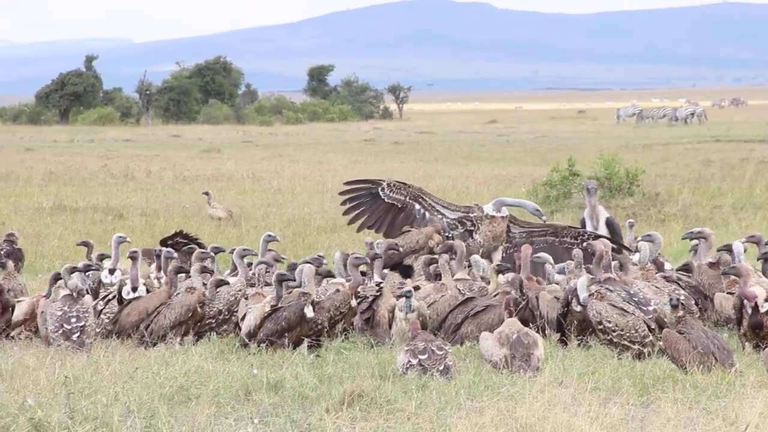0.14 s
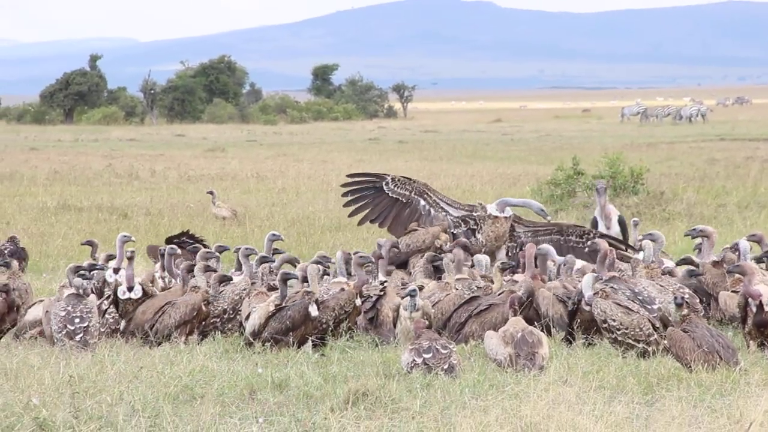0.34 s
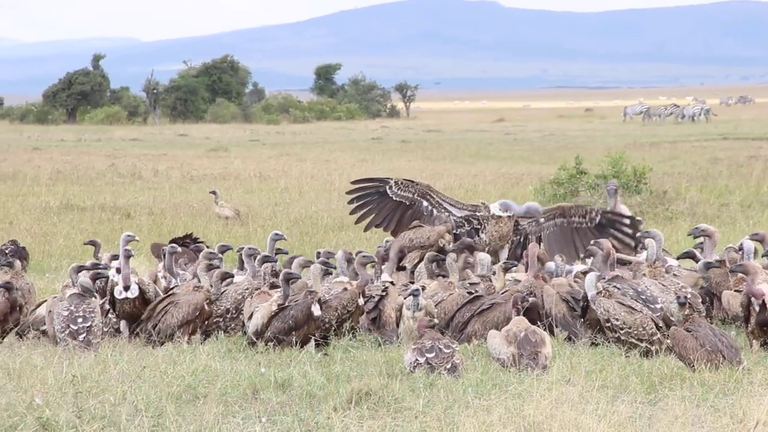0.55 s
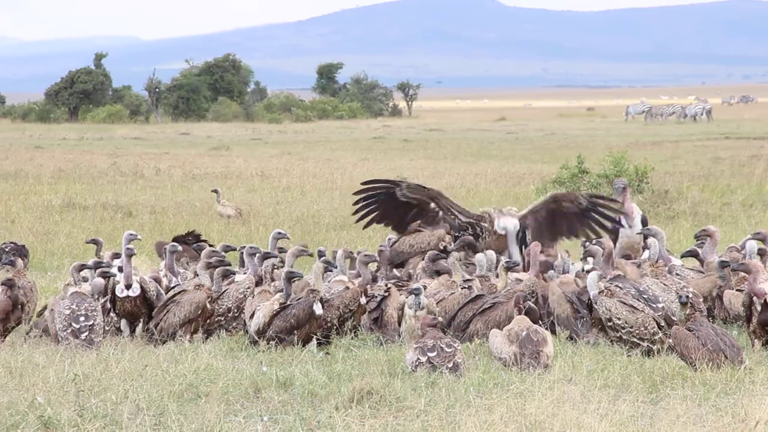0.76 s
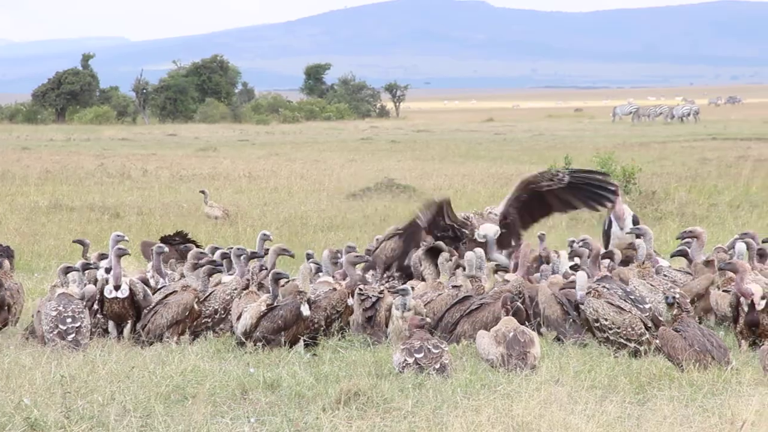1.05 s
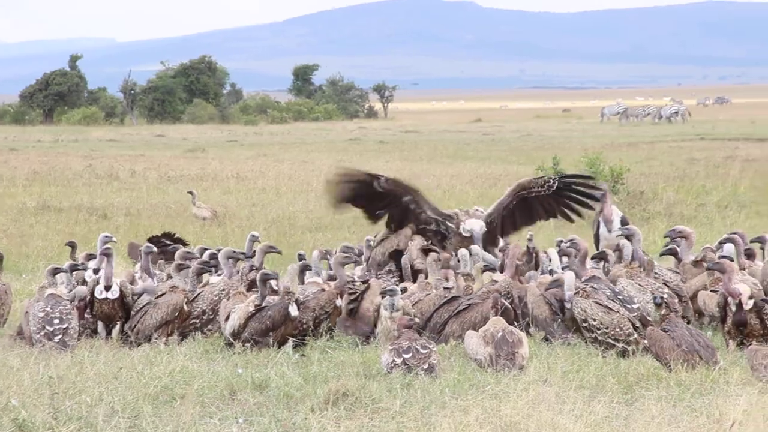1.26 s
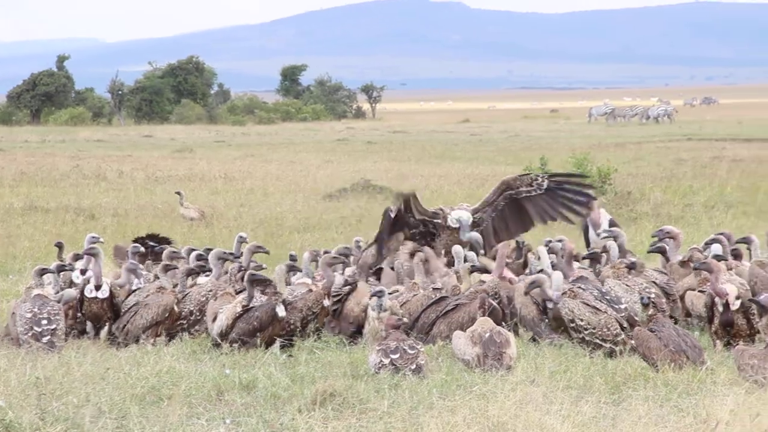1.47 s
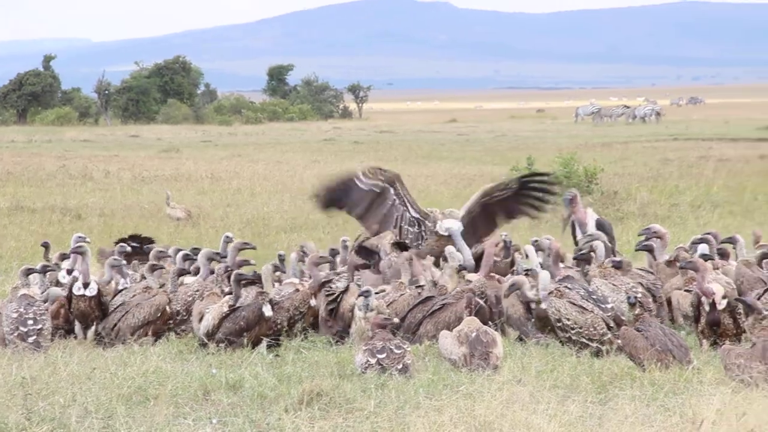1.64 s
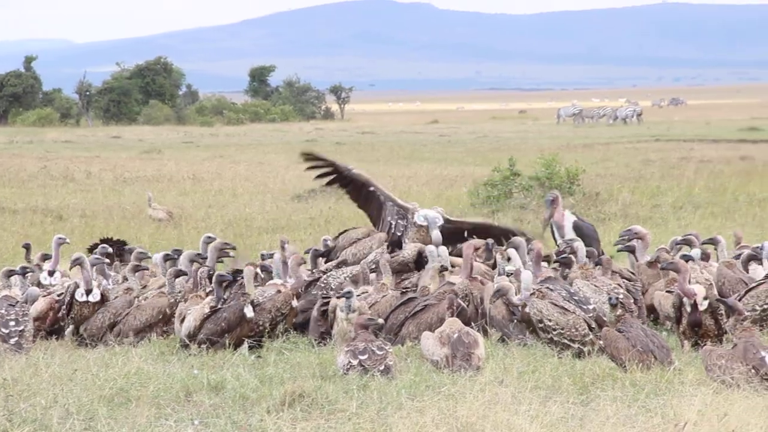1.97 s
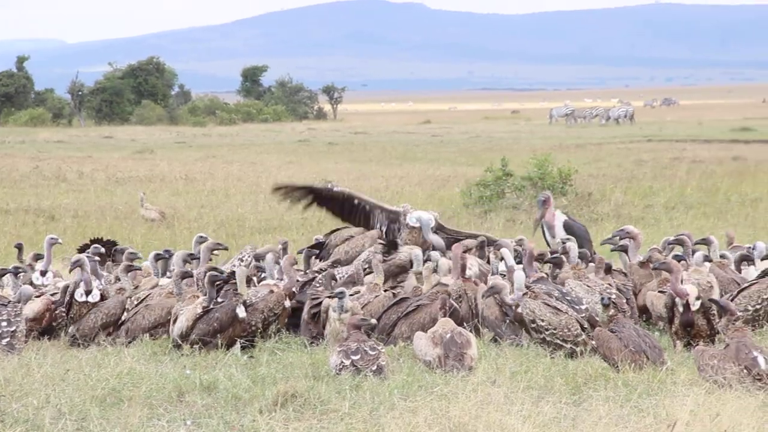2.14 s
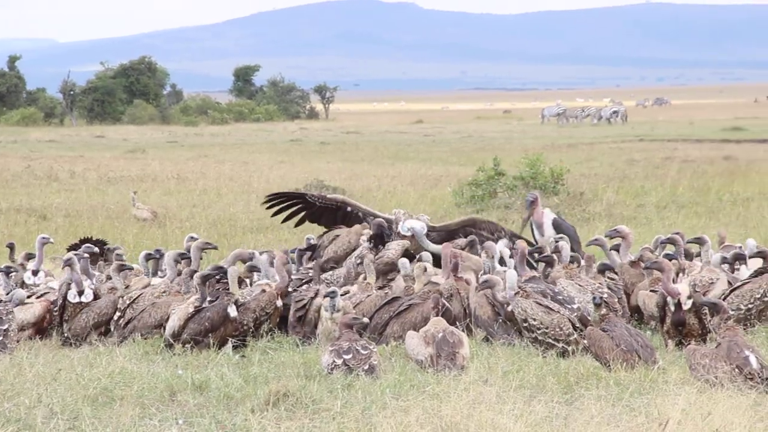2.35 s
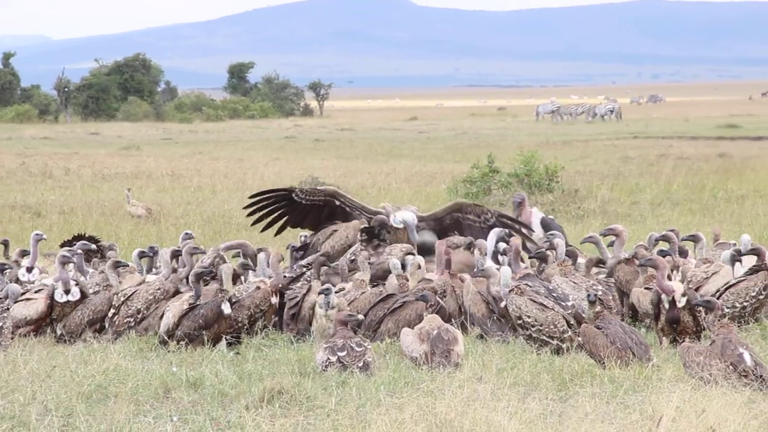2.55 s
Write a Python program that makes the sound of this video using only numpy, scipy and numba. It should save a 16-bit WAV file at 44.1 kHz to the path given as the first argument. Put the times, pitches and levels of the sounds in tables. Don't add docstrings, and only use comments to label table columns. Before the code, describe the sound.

Hoarse, clicking vulture calls burst out in quick succession, joined by yelps and whines, until a loud rasp leads into a long rough hiss; faint high trills, distant croaking crowd, low wind rumble and recorder hiss.

```python
import sys
import numpy as np
from scipy import signal
from scipy.fft import rfft, irfft
from scipy.io import wavfile
from scipy.ndimage import uniform_filter1d
from numba import njit

SR = 44100
rng = np.random.default_rng(int(sys.argv[2]) if len(sys.argv) > 2 else 0)


def natural_amplitude(level_db):
    exponent = np.asarray(level_db, float) / 20
    return 10 ** exponent


def generate_wav(signal):
    frames = np.transpose(np.atleast_2d(signal))
    scaled = np.clip(frames, -1, 1) * 32767
    pcm = np.round(scaled).astype(np.int16)
    wavfile.write(sys.argv[1], SR, pcm)


N = 119511


@njit
def svf(x, hz, width):
    y, b, l = np.empty(len(x)), 0., 0.
    for i in range(len(x)):
        g, k = np.tan(np.pi * hz[i] / SR), width / hz[i]
        v = (b + g * (x[i] - l)) / (1 + g * (g + k))
        b, l, y[i] = 2 * v - b, l + 2 * g * v, k * v
    return y


def band(x, lo_hz, hi_hz):
    return signal.sosfilt(signal.butter(2, [lo_hz, hi_hz], "bandpass", fs=SR, output="sos"), x)


def unit(x):
    return x / np.sqrt(np.mean(x ** 2))


def walk(rate, n):
    k = int(SR / rate)
    steps = np.repeat(rng.standard_normal(n // k + 1), k)
    return 1.14 * uniform_filter1d(uniform_filter1d(steps, k), k)[:n]


def add(out, start_s, x):
    i = int(start_s * SR)
    a, b = max(i, 0), max(min(i + len(x), N), 0)
    out[a:b] += x[a - i:][:b - a]


def clicks(n, hz, breath_db, jitter=.45, scatter_db=5):
    c = rng.standard_normal((n // 40, 2))
    at = np.cumsum(np.exp(jitter * c[:, 0]) * SR / hz).astype(int)
    x = np.zeros(n)
    x[at[at < n]] = natural_amplitude(scatter_db * c[at < n, 1])
    breath = natural_amplitude(breath_db + 1.53 * walk(150, n)) * rng.standard_normal(n)
    return unit(x - x.mean()) + breath


def throat(x, peaks, sign=-1, drift=.01):
    out = 0
    for k, (hz, width, db) in enumerate(peaks):
        moving_hz = hz * (1 + drift * walk(12, len(x)))
        out = out + sign ** k * natural_amplitude(db) * svf(x, moving_hz, 1. * width)
    return out


def rasps():
    # start in seconds, length in seconds, level in dB, throat in Hz, upper resonance in dB
    calls = [(-.02, 0.044, -35, 2350, -11), (0.038, .19, -38.5, 1850, -5.5), (0.237, 0.086, -48, 1560, 2.5),
             (.30, 0.064, -38, 1750, -8), (0.367, 0.21, -41.5, 1950, -3.5), (0.403, 0.058, -43, 1720, -6),
             (0.549, 0.12, -38.5, 1650, -11), (0.659, 0.1, -37.5, 1930, -9.5),
             (0.742, 0.038, -35, 1640, -16), (0.776, 0.045, -35.5, 1920, -5.5),
             (.815, 0.039, -37, 1450, -8.5), (0.851, 0.02, -34.5, 2040, -3.5),
             (0.887, 0.023, -39, 1810, -11), (.94, 0.023, -31.5, 1910, -7.5),
             (1.021, 0.043, -37, 1810, -18), (1.155, 0.06, -41, 1750, -3), (1.209, 0.13, -38, 1880, -8),
             (1.443, 0.073, -38.5, 1620, -3.5), (1.648, 0.155, -23, 1720, -19),
             (1.654, 0.05, -29.5, 1950, -16)]
    click_hz, breath_db, scatter_db = 417.2, 1, 3
    attack_s, swell, release_s, sag_db = .009, 0.053, .014, -4.5
    fall_per_s, upper_ratio = .6, 1.924
    out, n = np.zeros(N), 2 * SR // 9
    t = np.arange(n) / SR
    for s, length, db, hz, up_db in calls:
        x = clicks(n, click_hz, breath_db, .4, scatter_db)
        hz = hz * (1 - fall_per_s * (t - length / 2))
        low_peaks = [(0.773 * hz, 180, -3), (1.003 * hz, 220, 0), (0.991 * hz, 220, 0), (1.286 * hz, 320, -5)]
        up_peaks = [(0.77 * upper_ratio * hz, 300, -2), (upper_ratio * hz, 600, 0), (2.56 * hz, 500, -10)]
        low = unit(throat(x, low_peaks, -1.025, 0.022))
        up = unit(throat(x, up_peaks))
        swelling = np.clip(t / (attack_s + swell * length), 0, 1)
        release = np.exp(-np.maximum(t - length, 0) / release_s * 2)
        level = natural_amplitude(db + sag_db * np.clip(t / length, 0, 1))
        add(out, s, level * swelling * release * (low + natural_amplitude(up_db) * up))
    return out


def air(t):
    # frequency in Hz, noise density of the open plain in dB per Hz
    plain_curve = [(12, -29), (20, -4), (96, -14), (897, -16), (1060, -9), (2750, -15.5), (2990, -33),
                   (4540, -78), (16000, -54)]
    # resonance in Hz, width in Hz, level in dB
    crowd_peaks = [(604, 20.3, 2), (803, 24, 2), (1245, 250, -3), (1730, 820, -1), (3530, 4140, -8.5),
                   (4900, 1070, -7)]
    # centre of a wind bump in seconds, level in dB, length in seconds
    bumps = [
        (0.037, -45.5, 0.069),
        (0.149, -49.5, 0.11),
        (0.325, -45, 0.062),
        (0.415, -49, 0.066),
        (0.594, -61, 0.083),
        (1.016, -62, 0.039),
        (1.116, -46.5, 0.084),
    ]
    plain_db, crowd_db, rumble_db, breeze_db = -53.5, -51, -63.5, -74.5
    f = np.fft.rfftfreq(N, 1 / SR) + 1
    p = np.array(plain_curve)
    shape = natural_amplitude(np.interp(np.log(f), np.log(p[:, 0]), p[:, 1])) * (f > 90)
    plain = unit(irfft(rfft(rng.standard_normal(N)) * shape, N))

    croaks = clicks(N, 112, -3, .12, 1.7)
    crowd = unit(band(throat(croaks, crowd_peaks), 450, 6400)) * natural_amplitude(crowd_db + 2 * walk(10.05, N))

    rumble = unit(throat(rng.standard_normal(N), [(159.3, 18.7, 5.0), (308, 110, -3.5)]))
    rumble = rumble * natural_amplitude(rumble_db + 0.5 * walk(7.3, N))

    gust = natural_amplitude(breeze_db + 2 * walk(7.9, N))
    for s, db, length in bumps:
        gust = gust + natural_amplitude(db) * np.exp(-2 * ((t - s) / length * 2) ** 2)
    wind = throat(throat(rng.standard_normal(N), [(41, 39, 0)]), [(42.2, 33, 0)])
    wind = wind / np.sqrt(uniform_filter1d(wind ** 2, size=6000) + 1e-18)
    return natural_amplitude(plain_db) * plain + crowd + rumble + gust * wind


def grass_bird():
    trill_ends = [.077, 0.877, 1.477, 2.022, 2.595]
    # offset from the trill's last note in seconds, level in dB
    trill = [(0, 0), (-.025, 0), (-.047, -1), (-.066, -2), (-.082, -4), (-.094, -7)]
    triples = [.155, .314, .959, 1.555, 1.636, 1.724, 2.100, 2.181, 2.673]
    doubles = [0.229, .417, .535, 0.686, 1.040, 1.153, 1.275, 1.817, 2.279, 2.399]
    # offset from the chip's last note in seconds, level in dB
    chip = [(.002, -1), (-.008, -3), (-.019, -5)]
    note_db, note_s, note_hz, fall_hz = -52.5, 0.015, 7120, 850
    out = np.zeros(N)
    # times, notes, how far below note_hz, share of the full note length
    phrases = ((trill_ends, trill, 0, 1), (triples, chip, 250, .7), (doubles, chip[:2], 250, .7))
    for starts, notes, drop_hz, span in phrases:
        u = np.arange(int(span * note_s * SR)) / (span * note_s * SR)
        for s in starts:
            for offset, db in notes:
                c = rng.standard_normal(2)
                hz = note_hz - drop_hz + 40 * c[0] - span * fall_hz * u
                tone = np.sqrt(2) * np.sin(2 * np.pi * np.cumsum(hz) / SR)
                add(out, s + offset - .002, natural_amplitude(note_db + db + c[1]) * np.sin(np.pi * u) * tone)
    return out


def stack(hz, partials_db):
    phase = 2 * np.pi * np.cumsum(hz * (1 + .006 * walk(119.5, len(hz)))) / SR
    out = 0
    for k, db in enumerate(partials_db):
        out = out + natural_amplitude(db + 2 * walk(39.6, len(hz))) * np.sin((k + 1) * phase)
    return out * np.sqrt(2)


def squeaks():
    # start in seconds, length in seconds, level in dB, pitch in Hz, glide as a share of pitch
    yelps = [(1.116, 0.0366, -38, 520, -0.088), (1.275, 0.062, -40.5, 680, -0.066),
             (.73, .07, -42.5, 600, -0.096), (.59, .05, -42.5, 620, .05), (0.53, 0.1, -51.5, 960, .07),
             (1.162, 0.042, -36, 490, 0.33), (1.69, 0.118, -39.5, 388, -.14),
             (0.098, 0.125, -44.5, 640, .03), (0.78, 0.0603, -44, 652.5, 0.032),
             (1.6, 0.054, -38.5, 550, 0.011), (.41, 0.065, -42, 570, -0.0073),
             (0.45, 0.066, -54, 1000, 0.14), (.305, 0.0344, -43.5, 460, -0.0084)]
    coos = [(.19, .14, -56, 800, 0.226), (0.31, 0.088, -58, 850, -0.005), (.66, 0.223, -58, 830, -0.053),
            (0.3, 0.057, -53, 1200, 0)]
    screeches = [(1.205, 0.091, -42, 600, -0.0194), (.17, 0.0482, -52, 580, 0.0039)]
    yelp_partials = [-40, -20, 0, -3, -15]
    coo_partials = [0, -14]
    screech_partials = [-40, -14, 0, -9, -6, -10, -13, -8, -22]
    out = np.zeros(N)
    for calls, partials_db in ((yelps, yelp_partials), (coos, coo_partials), (screeches, screech_partials)):
        for s, length, db, hz, glide in calls:
            u = np.clip(np.arange(SR // 4) / SR / length, 0, 1)
            bow = np.abs(np.sin(np.pi * u))
            arch = max(.011 / length - .11, 0)
            pitch = hz * (1 + glide * (u - .5) + arch * (bow - .6))
            add(out, s, natural_amplitude(db) * (u < 1) * bow ** 0.5 * stack(pitch, partials_db))
    return out


def whines(t):
    # time in seconds, pitch in Hz, level in dB
    whine_calls = [
        [(.15, 600, -56), (.25, 600, -56), (.33, 645, -53), (.39, 570, -54), (.5, 570, -55), (.57, 590, -56)],
        [(.57, 620, -58), (.6, 648, -53), (.7, 558, -53), (.78, 538, -54), (.87, 610, -54), (.94, 570, -60),
         (1.0, 555, -58), (1.07, 610, -56)],
    ]
    whine_partials = [-16, 4, -4, 0, -7, -13]
    out = np.zeros(N)
    for call in whine_calls:
        s, hz, db = np.array(call).T
        fade = np.clip(np.minimum(t - s[0], s[-1] - t) / 0.018, 0, 1)
        out += stack(np.interp(t, s, hz), whine_partials) * natural_amplitude(np.interp(t, s, db)) * fade
    return out


def long_rasp(t):
    # time in seconds, level in dB, upper resonance in dB, beak-open treble in dB
    course = [(1.12, -50, -2.5, -12), (1.17, -42, -7, -22), (1.26, -42.5, -5.5, -13),
              (1.33, -40.5, -1, -19), (1.4, -42.5, -4.5, -23), (1.57, -34.5, -7, -25.5),
              (1.8, -35.5, -7, -26), (1.92, -37, -3, -19), (2.01, -35, -3, -19.5), (2.11, -34.5, -2, -20),
              (2.18, -32, -1, -18), (2.3, -32, -3, -18.5), (2.4, -33.5, -3, -19.5), (2.5, -35.5, -6, -15.5),
              (2.6, -35, -5, -22.5), (2.71, -36.5, -2, -23)]
    # Hz, width in Hz, level in dB
    lower_peaks = [(799, 32, 0.5), (1230, 200, -4), (1640, 240, 3), (1940, 240, 1.5), (2250, 240, -1)]
    upper_peaks = [(3067, 300, 1), (3380, 320, 1), (3880, 300, -3)]
    treble_peaks = [(4720, 200, 6), (5150, 220, 4), (5800, 600, -2), (9800, 1500, -10)]
    # lower and upper edge in Hz of one group, in the same order
    edges_hz = [(1050, 2400), (2900, 4200), (4500, 10800)]
    # first row times in seconds, second row breath in dB
    breath = [(1.8, 2.1), (-2, -7.5)]
    s, db, up_db, top_db = np.array(course).T
    x = clicks(N, 300, np.interp(t, *breath), .3, 2)
    groups = []
    for peaks, edges in zip((lower_peaks, upper_peaks, treble_peaks), edges_hz):
        groups.append(unit(band(throat(x, peaks, 1, .018), *edges)))
    low, up, top = groups
    level = natural_amplitude(np.interp(t, s, db)) * natural_amplitude(.5 * walk(25.15, N)) * (t > s[0])
    return level * (low + natural_amplitude(np.interp(t, s, up_db)) * up + natural_amplitude(np.interp(t, s, top_db)) * top)


def ground_echo(x):
    echo_db, t60_s = -8, 0.11
    k = np.arange(SR // 5) / SR
    tail = rng.standard_normal(len(k)) * natural_amplitude(-60 * k / t60_s) * (k > .003)
    return natural_amplitude(echo_db) * signal.fftconvolve(x, tail / np.sqrt(np.sum(tail ** 2)))[:N]


def scene():
    t = np.arange(N) / SR
    vultures = band(rasps(), 1070, 4940) + squeaks() + whines(t) + long_rasp(t)
    return (vultures + ground_echo(vultures) + grass_bird() + air(t))[None]


def roll_off(x):
    return signal.sosfilt(signal.butter(12, 16770, fs=SR, output="sos"), x)


def record(dry):
    hiss_db, top_hz = -59.5, 15700
    x = dry + .001 + natural_amplitude(hiss_db) * rng.standard_normal(dry.shape)
    mix = signal.sosfilt(signal.ellip(10, .2, 70, top_hz, fs=SR, output="sos"), x)
    return roll_off(mix)


dry = scene()
out = record(dry)
generate_wav(out)
```